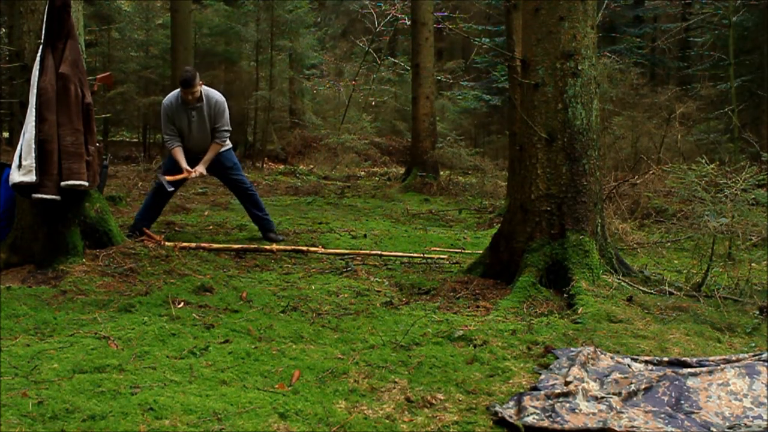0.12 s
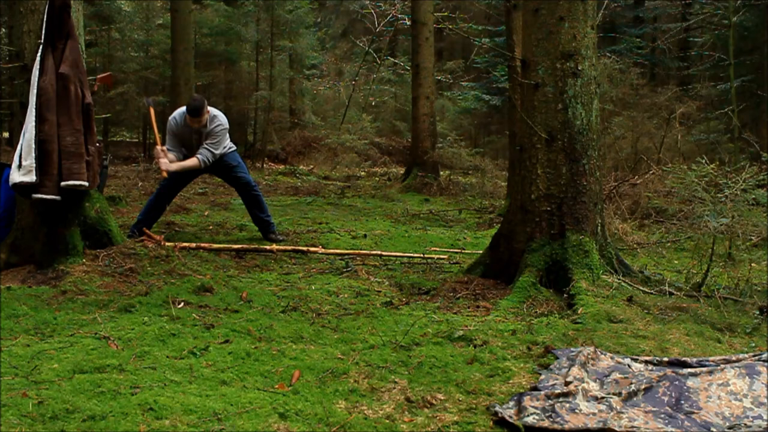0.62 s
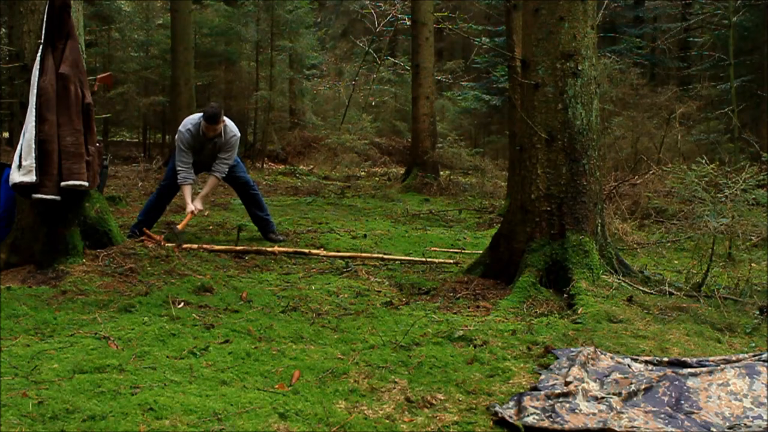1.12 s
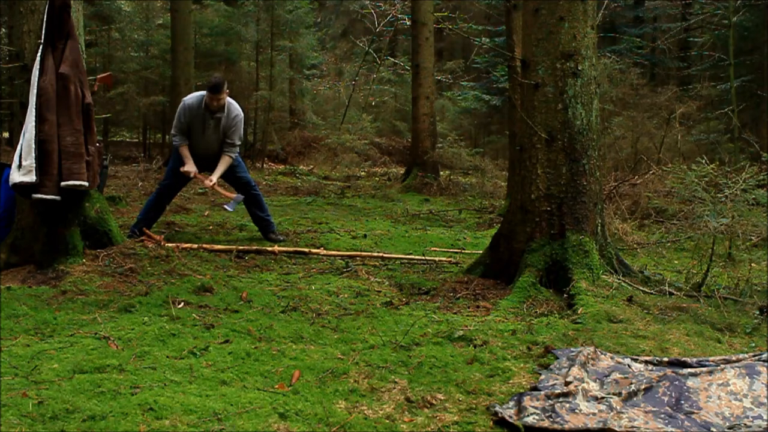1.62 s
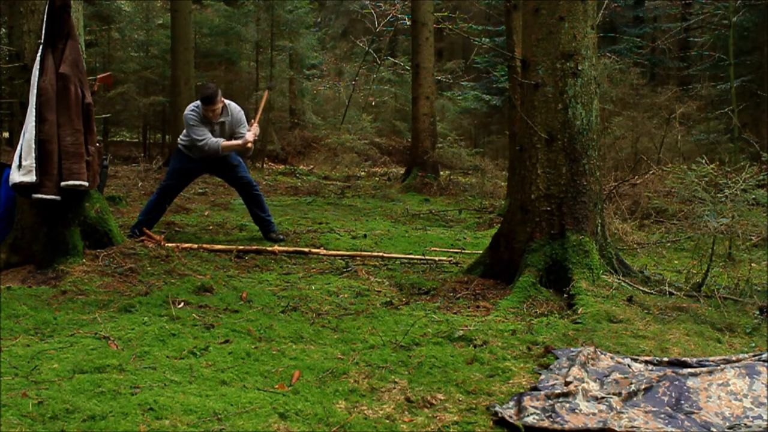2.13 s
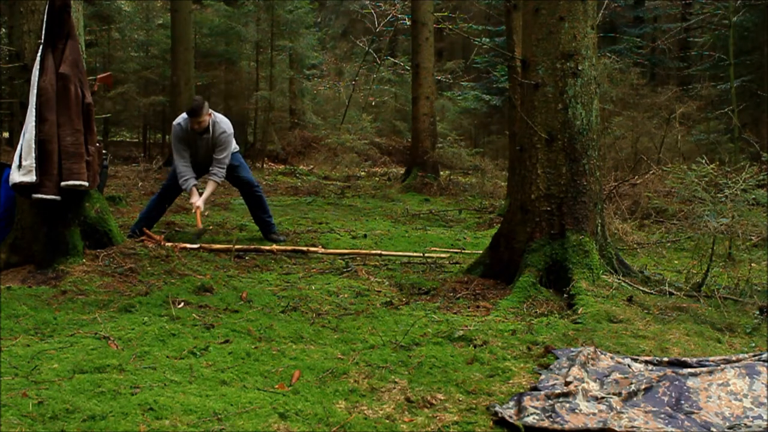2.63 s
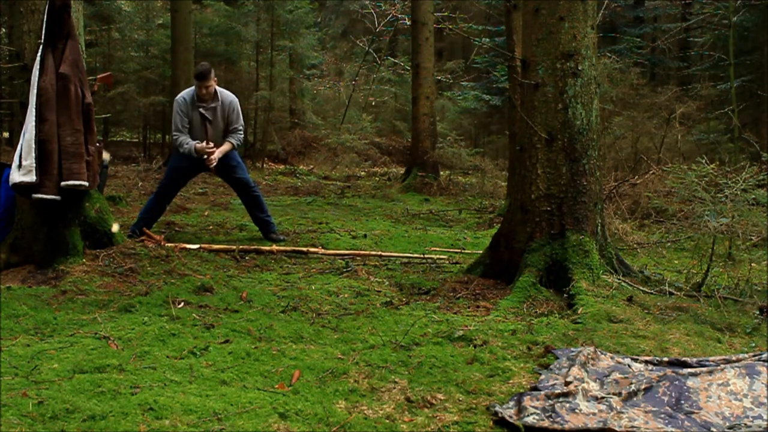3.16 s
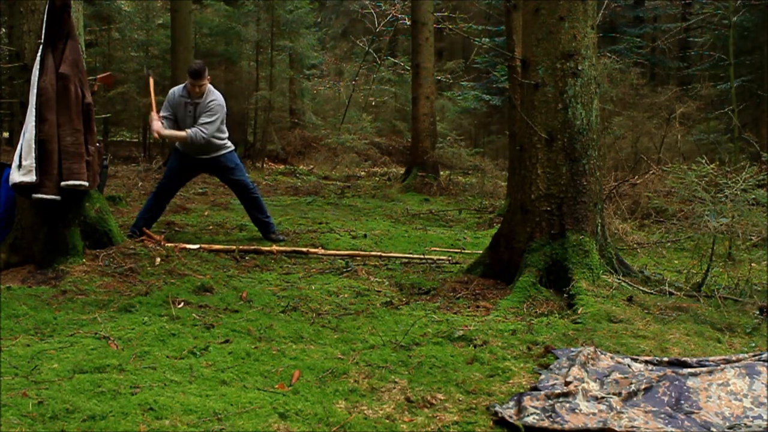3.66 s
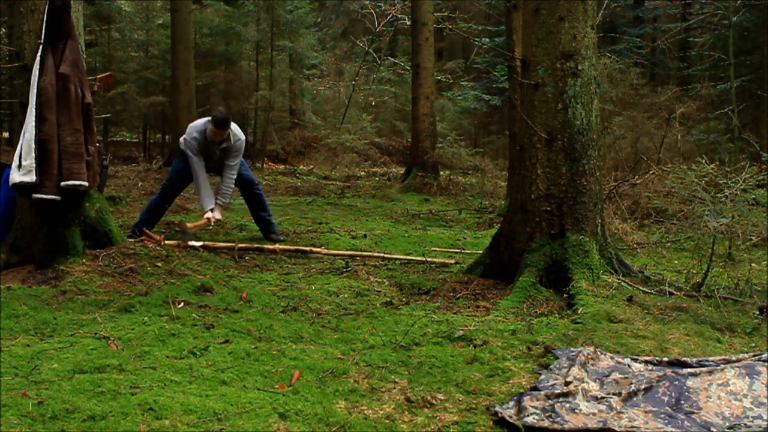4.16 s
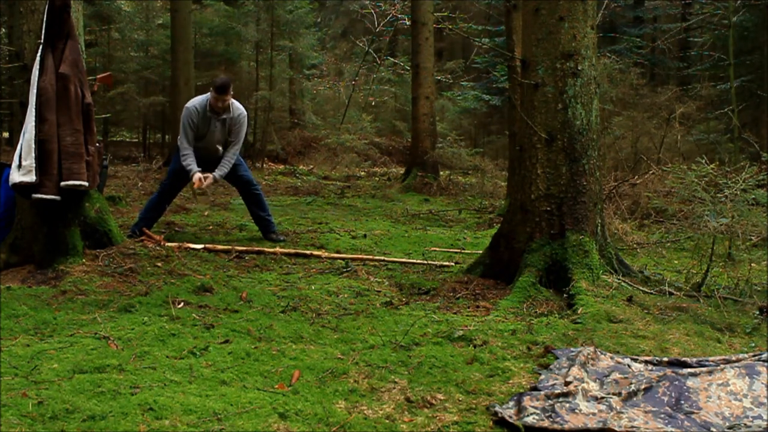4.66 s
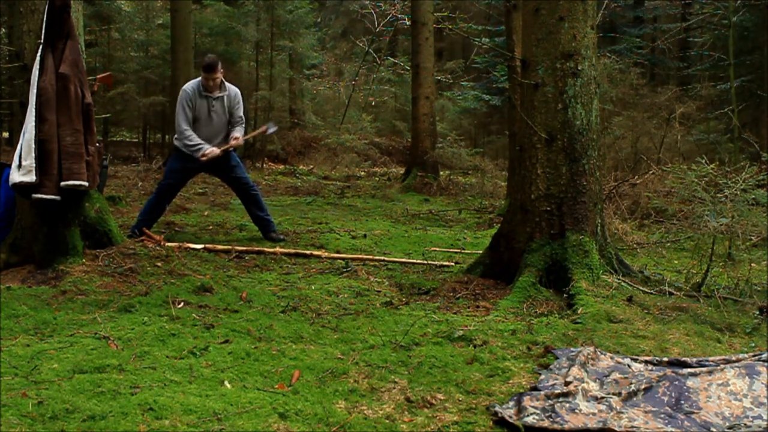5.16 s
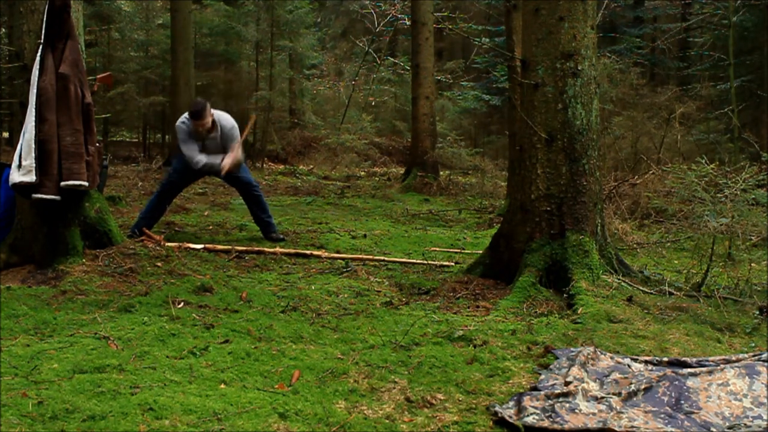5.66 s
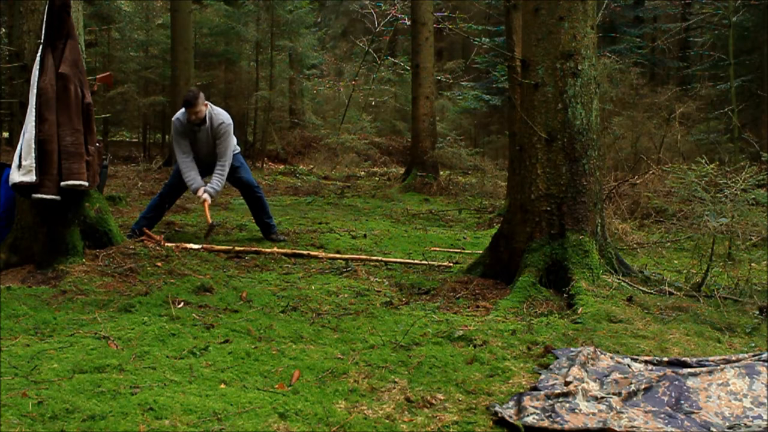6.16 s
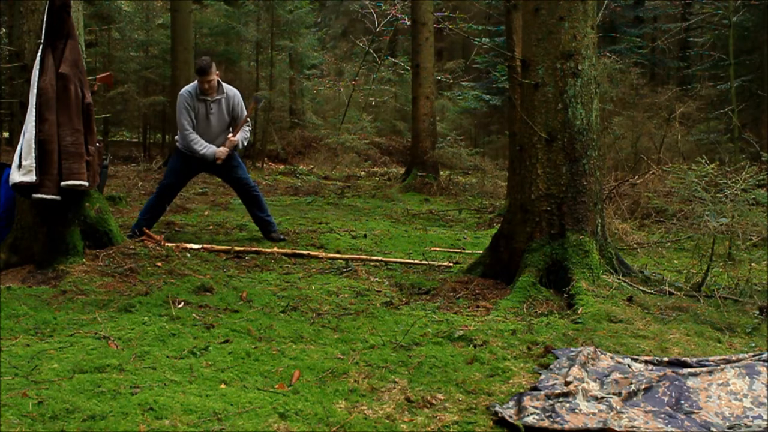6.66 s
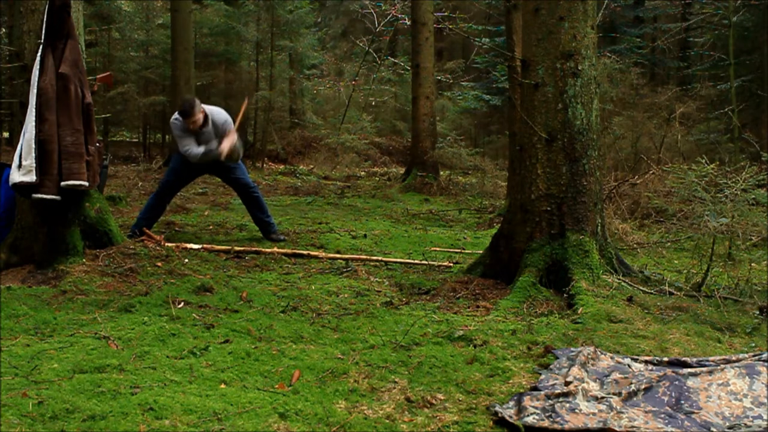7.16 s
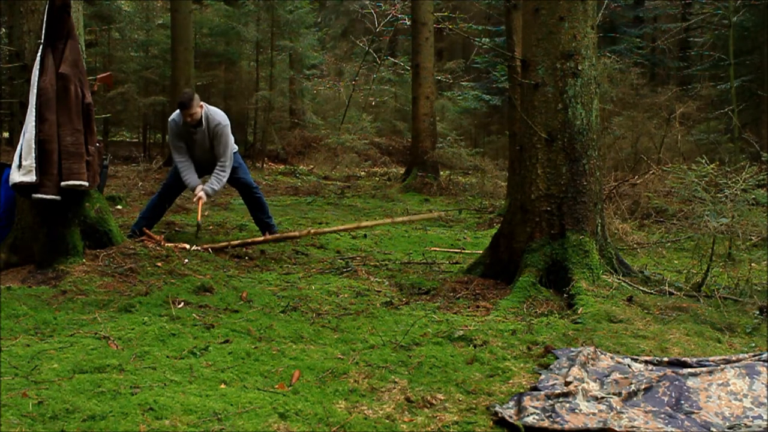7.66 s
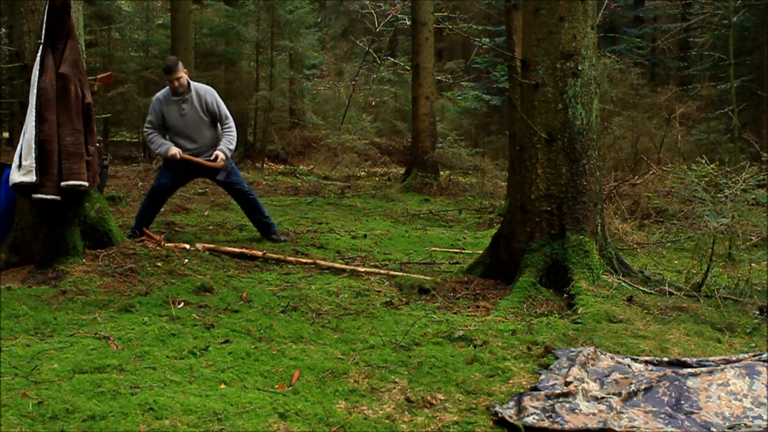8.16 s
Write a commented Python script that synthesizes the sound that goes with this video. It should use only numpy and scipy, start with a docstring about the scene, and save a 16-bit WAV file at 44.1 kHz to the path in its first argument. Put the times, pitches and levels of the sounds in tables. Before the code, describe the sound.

Spaced axe blows crack and knock on a light pole, echoing briefly off trees, while chips snap and a distant bird whistles.

```python
"""Chopping a pole in the forest

An axe chops a thin wooden pole lying on moss in a quiet conifer forest: noise and clicks drive its modes.
The pole rebounds, chips and twigs tick as short ringing snaps, and the trunks scatter the knocks back.
A far bird whistles long fluttering notes; a hand rubs along the handle as band-passed grit.
The microphone feeds only the right input and overloads on the blows; the left holds hiss and crosstalk."""
import sys
import numpy as np
from scipy import signal
from scipy.fft import rfft, irfft
from scipy.io import wavfile

SR = 44100
rng = np.random.default_rng(int(sys.argv[2]) if len(sys.argv) > 2 else 0)


def master(y):
    """Save y as 16-bit WAV."""
    cut = np.clip(np.atleast_2d(y).T, -1, 1)
    pcm = np.round(cut * 32767)  # scale
    wavfile.write(sys.argv[1], SR, pcm.astype(np.int16))


def voltage_ratio(level):
    """Linear amplitude factor for a level in decibels (scalar or array-like)."""
    return 10 ** (np.asarray(level, float) / 20)


N = 366030  # length in samples

# Source levels are relative, ahead of the layer balance and the input gain.
# forest hush, colour: f/Hz, level per Hz/dB
AIR_COLOUR = [(15, -38.5), (25, -1), (64, 1), (120, -2.5), (149, -11), (277, -6), (451, -4.5), (560, -3.5),
              (887, -2), (1940, -18.5), (2760, -14.5), (4030, -18), (5000, -17.5), (14800, -23.5),
              (16000, -21.5)]
# left input hiss, colour: f/Hz, level per Hz/dB
HISS_COLOUR = [(30, -9), (90, -4), (250, -6), (700, -1), (1050, 2), (1400, -3.5), (2100, -7.5),
               (2900, -2.5), (4100, -7), (5300, -6.5), (8000, -9), (16000, -10)]
# likeness of the left hiss to the right hush: f/Hz, correlation (0 to 1)
LIKENESS = [(30, 0.22), (200, 0.087), (700, 0.2), (1100, 0.7), (2000, 0.16), (3000, 0.62), (5300, 0.4),
            (9000, 0.24), (16000, .05)]
AIR_DB, HISS_DB = -68.5, -68  # rms

# hand sliding along the handle: middle t/s, rms level at the middle/dB
SLIDES = [(0.069, -66), (1.97, -71.5), (3.36, -76), (3.74, -73.5), (7.147, -74)]
SLIDE_HALF_S = 0.071  # from the middle to 1/e of the level

# axe blows: t/s, wood ring level/dB, ground thud level/dB, fibre crack level/dB, shaking t60/s
BLOWS = [(0.8928, -16.5, -34.5, -18, 0.058), (2.4603, -13.5, -65, -15.5, 0.075),
         (4.204, -12, -34.5, -12, 0.088), (5.8695, -14.5, -28.5, -14, 0.061),
         (7.4095, -11.5, -28, -9, 0.059)]
BLOW_HZ, BLOW_OCTAVES_PER_DB = 800, 0.41  # best-struck pitch at the mean crack level; sharper strikes higher
# further contacts after each blow: within some 40 ms the edge bites on into the fibres, later the pole jumps
# and knocks again: t/s, wood ring level/dB, fibre crack level/dB, best-struck f/Hz
FOLLOW_UPS = [(.919, -26, -39, 616), (.97, -44.5, -60, 341), (1.057, -39.5, -53, 576), (1.172, -56, -79, 800),
              (2.486, -21.5, -45, 810), (2.609, -35.5, -69, 850), (4.221, -23, -30.5, 700),
              (4.2395, -34.5, -31, 984), (4.393, -39.5, -55, 990), (5.913, -31, -66, 800),
              (5.961, -26, -50, 933), (6.032, -39.5, -59, 561), (7.430, -33.5, -68.5, 330),
              (7.469, -49, -61, 950), (7.917, -44, -47, 1190), (7.932, -46, -42.5, 1200),
              (7.993, -53.5, -86, 440)]
SHAKE_CYCLES = 70.4  # t60 of a follow-up contact's shaking, in cycles of its best-struck pitch
# a flat, low landing thuds most (drive in dB re the ring's drive); higher knocks thud less
FLAT_HZ, FLAT_THUD_DB, THUD_DB_PER_OCTAVE = 330, -10, -10
# modes of the pole: f/Hz, level/dB, t60/s
POLE_MODES = [(224.4, -6.5, 0.115), (318.6, -6.5, 0.17), (356, -6, 0.11), (420.7, -9, 0.1),
              (501.8, -1.5, 0.11), (590, -1, 0.084), (678, -1.5, 0.095), (746, -1.5, 0.052),
              (795.7, -1, 0.072), (850, 2.5, 0.0412), (938, 2, 0.064), (1045, 1, 0.024),
              (1161.5, -3.5, .06), (1250, -7, 0.046), (1730.5, -11, 0.03), (2103, -11, 0.046)]
OFF_PITCH_DB = 1.5  # loss of a mode one octave off the best-struck pitch; grows with the octaves squared
# modes of the soft ground: f/Hz, level/dB, t60/s
GROUND_MODES = [(93.5, -8.5, 0.13), (183, 3, 0.023), (290, -0.5, 0.064)]
# tearing fibres, colour: f/Hz, level per Hz/dB
CRACK_COLOUR = [(710, -33), (1200, 1), (1980, -8), (2890, -3.5), (3590, -4.5), (4130, -12), (7170, -22),
                (7820, -22), (10100, -24), (14400, -23.5), (16000, -42)]
CRACK_SHARE = 0.44  # the tearing dies in this share of the shaking time

# the trunks' scatter, colour: f/Hz, level per Hz/dB
SCATTER_COLOUR = [(40, -10), (70, -1.5), (250, 9.5), (450, -2), (950, -5.5), (1400, -1.5), (2000, -13),
                  (3100, -8.5), (4000, -16.5), (5200, -18.5), (8000, -30), (16000, -43.5)]
# dying away among the near trunks: f/Hz, t60/s
FOREST_T60 = [(80, 0.48), (250, 0.24), (900, 0.77), (2000, 0.64), (4000, 0.59), (7000, 0.42), (14000, 0.63)]
FAR_DB = -16.5  # echo of the far trunks re the near ones
SPLIT_HZ = 1400  # bands starting above this echo the cracks, the others echo the knocks
SCATTER_DB, LOW_SCATTER_DB = 12, -29.5  # high and low echo
LONG_SHAKE_DB = 15.5  # gained per decade of shaking time: longer contact sends more energy into the trees

# bird notes: start t/s, f/Hz, level/dB
WHISTLES = [(.94, 4220, -70.5), (1.165, 4040, -71), (3.827, 4380, -72), (4.061, 4130, -71.5),
            (4.37, 4340, -71.5), (6.899, 4170, -70.5), (7.118, 4190, -68)]
NOTE_S = 0.22  # a note is held this long before it fades
FLUTTER = 0.93  # depth of a note's flutter re the steady tone
# blurred band under each note's start: how far below, level re the note, t60
SKIRT_HZ, SKIRT_DB, SKIRT_T60_S = 100, 0, 0.68

# chips and twigs: t/s, peak level/dB, f/Hz, ring t60/cycles
TICKS = [(1.373, -59, 2270, 25), (1.455, -50, 1000, 22), (2.4277, -54, 2720, 25), (2.5669, -43, 2870, 19),
         (2.6965, -43.5, 1260, 44), (2.819, -46.5, 1210, 28), (3.5896, -52, 3296, 40),
         (4.6591, -44, 1164, 29), (5.964, -33.5, 3100, 40), (6.2226, -37.5, 1200, 14),
         (6.2833, -54.5, 1738, 25), (7.4484, -59, 2920, 30), (7.457, -23.5, 3123, 26),
         (7.753, -39.5, 1695, 67), (7.9236, -36.5, 1710, 39), (7.939, -46.5, 1250, 16),
         (7.9652, -52, 2360, 49), (8.089, -37, 1250, 77)]
# overtones of a chip: multiple of its pitch, level/dB
CHIP_OVERTONES = [(1, 6.5), (1.4, -4.5), (1.8, -3.5), (2.4, -11)]
CHIP_TOP_HZ = 3500  # overtones above this are damped by the moss
SNAP_CYCLES, SNAP_DB, SNAP_FRONT_DB = 17.5, 10, 3.5  # snap t60 in cycles; broad snap re the ring; first click

MIC_GAIN_DB, CROSSTALK_DB, OVERLOAD = 4, -50, 0.2  # OVERLOAD: amplitude ceiling of the overload stage


def rms_one(x):
    """Scale to rms 1."""
    return x / np.sqrt(np.mean(x ** 2) + 1e-20)


def at_hz(points, hz):
    """Read a table on a log-frequency axis."""
    table_hz, values = np.array(points).T
    return np.interp(np.log(np.maximum(hz, 1)), np.log(table_hz), values)


def coloured(x, spectrum):
    """Give white noise a spectrum."""
    size = x.shape[-1]
    gain = voltage_ratio(at_hz(spectrum, np.fft.rfftfreq(size, 1 / SR)))
    return irfft(rfft(x) * gain, size)


def band(x, low_hz, high_hz):
    """Band-pass."""
    return signal.sosfilt(signal.butter(2, [low_hz, high_hz], "band", fs=SR, output="sos"), x)


def low_pass(x, hz):
    """Keep only the slow wander of a noise."""
    return signal.sosfilt(signal.butter(2, hz, fs=SR, output="sos"), x)


def high_pass(x, order, hz):
    """Cut the bass."""
    return signal.sosfilt(signal.butter(order, hz, "high", fs=SR, output="sos"), x)


def ring(force, hz, t60):
    """A mode driven by a force; unit noise rings it at about unit height."""
    r, w = voltage_ratio(-60 / (t60 * SR)), 2 * np.pi * hz / SR
    drive = np.sin(w) * np.sqrt(1 - r * r)
    return signal.lfilter([0, drive], [1, -2 * r * np.cos(w), r * r], force + 1e-18)


def bursts(starts, levels_db, t60s, rise_s):
    """Envelope of bursts that rise fast and die away."""
    out = np.zeros(N)
    for s, db, t60, rise in zip(starts, levels_db, t60s, np.broadcast_to(rise_s, len(starts))):
        i = int(s * SR)
        t = np.arange(min(N - i, SR // 2)) / SR
        decay = voltage_ratio(db - 60 * t / max(t60, .003))
        out[i:i + len(t)] += decay * (1 - np.exp(-t / rise))
    return out


def fronts(starts, levels_db):
    """The first shock of each contact as one click."""
    out = np.zeros(N)
    out[(np.asarray(starts) * SR).astype(int)] = voltage_ratio(levels_db)
    return out


def grit(spread_db):
    """Uneven random clicks: fibres giving way."""
    unevenness = np.minimum(rng.exponential(1, N), 5)
    return rms_one(rng.standard_normal(N) * voltage_ratio(spread_db * unevenness))


def hush():
    """Far wind in the crowns on the right, input hiss on the left: coloured noises, partly alike."""
    right, own = rfft(rng.standard_normal((2, N)))
    alike = np.clip(at_hz(LIKENESS, np.fft.rfftfreq(N, 1 / SR)), 0, 1)
    left = irfft(alike * right + np.sqrt(1 - alike ** 2) * own, N)
    hiss = voltage_ratio(HISS_DB) * rms_one(coloured(left, HISS_COLOUR))
    air = voltage_ratio(AIR_DB) * rms_one(coloured(irfft(right, N), AIR_COLOUR))
    return hiss, air


def hand():
    """Soft rubbing noise, strongest near 3 and 5 kHz, swelling and sinking with each slide."""
    t, noise = np.arange(N) / SR, grit(2.1)
    rub = rms_one(band(noise, 2595, 3650) + 0.6 * band(noise, 4800, 5000))
    return rub * sum(voltage_ratio(db) * np.exp(-((t - s) / SLIDE_HALF_S) ** 2) for s, db in SLIDES)


def contacts():
    """Blows and their follow-up contacts in one list: t/s, wood, thud and crack level/dB, shaking t60/s, best-
    struck f/Hz."""
    s, wood_db, thud_db, crack_db, shake_s = np.transpose(BLOWS)
    best_hz = BLOW_HZ * 2 ** (BLOW_OCTAVES_PER_DB * (crack_db - crack_db.mean()))
    blows = [s, wood_db, thud_db, crack_db, shake_s, best_hz]
    s, wood_db, crack_db, hz = np.transpose(FOLLOW_UPS)
    thud_db = wood_db + FLAT_THUD_DB + THUD_DB_PER_OCTAVE * np.log2(hz / FLAT_HZ)
    return np.hstack([blows, [s, wood_db, thud_db, crack_db, SHAKE_CYCLES / hz, hz]])


def pole_ring(s, wood_db, shake_s, best_hz):
    """Each contact shocks and shakes the pole's modes, most of all those near its best-struck pitch."""
    softness_db = wood_db.max() - wood_db
    # weak contacts are softer: slower to build, less of a first shock
    rise_s = 0.00024 * voltage_ratio(1.04 * softness_db)
    shock_db = 23.5 - 0.44 * softness_db
    jolts = grit(2.3)
    wood = 0
    for k, (hz, db, t60) in enumerate(POLE_MODES):
        struck_db = wood_db + db - OFF_PITCH_DB * np.log2(hz / best_hz) ** 2
        shaking = bursts(s, struck_db, shake_s, rise_s) * jolts + fronts(s, struck_db + shock_db)
        wood = wood + (-1) ** k * ring(shaking, hz, t60)
    return wood


def ground_thud(s, thud_db, shake_s):
    """The pole is driven into the moss: bursts of noise push a few short, low modes."""
    push = bursts(s, thud_db, shake_s, rise_s=0.0016) * rng.standard_normal(N)
    return sum(voltage_ratio(db) * ring(push, hz, t60) for hz, db, t60 in GROUND_MODES)


def fibre_crack(s, crack_db, shake_s):
    """Tearing fibres: a click, a short burst of grit and slower single splinters, through one colour."""
    grid = np.linspace(0, 1, 256)
    # level doubled because the minimum-phase version takes the square root of the response
    response = voltage_ratio(2 * at_hz(CRACK_COLOUR, grid * SR / 2))
    colour = signal.minimum_phase(signal.firwin2(511, grid, response))
    tearing = bursts(s, crack_db, CRACK_SHARE * shake_s, rise_s=0.0012) * grit(3.9)
    tearing += fronts(s, crack_db - 20.0)
    # splinters at 130 a second on average, about a millisecond each
    splits = (rng.random(N) < 130 / SR) * rng.exponential(1, N)
    parting = signal.lfilter([1], [1, -.97], splits)
    splintering = bursts(s, crack_db - 11, 0.99 * shake_s, rise_s=0.0085)
    tearing += splintering * (0.64 + 0.97 * parting) * rng.standard_normal(N)
    return signal.lfilter(colour / np.linalg.norm(colour), [1], tearing)


def chops():
    """The edge tears fibres (crack), shakes the pole (modes) and drives it into the moss (thud)."""
    s, wood_db, thud_db, crack_db, shake_s, best_hz = contacts()
    wood = pole_ring(s, wood_db, shake_s, best_hz)
    thud = ground_thud(s, thud_db, shake_s)
    crack = fibre_crack(s, crack_db, shake_s)
    return voltage_ratio(-3.0) * wood + voltage_ratio(8.5) * thud + voltage_ratio(4.5) * crack


def scatter_tails():
    """Lumpy low and high tails of noise in third-octave bands, each band dying at its own pace."""
    t = np.arange(2 * SR) / SR
    edges = 50 * 2 ** np.arange(0, 8.4, 1 / 3)
    tails = np.zeros((2, 2 * SR))
    trunks = rms_one(low_pass(rng.standard_normal(len(t)), 60))
    # some trunks stand out a little
    noise = coloured(rng.standard_normal(tails.shape) * voltage_ratio(2.2 * trunks), SCATTER_COLOUR)
    for k, (a, b) in enumerate(zip(edges, edges[1:])):
        fall_db = -60 * t / at_hz(FOREST_T60, np.sqrt(a * b))
        near_and_far = voltage_ratio(fall_db) + voltage_ratio(FAR_DB + 0.25 * fall_db)
        tails[int(a > SPLIT_HZ)] += band(noise[k % 2], a, b) * near_and_far
    # the nearest trunks are metres away, so the tail builds over some 20 ms
    return tails * (1 - np.exp(-(t / 0.02) ** 2)) / np.linalg.norm(tails)


def forest(knocks):
    """Trunks scatter each shock back: the lows echo the knocks themselves, the highs their cracks and snaps."""
    s, _, _, crack_db, shake_s, _ = contacts()
    sent_db = SCATTER_DB + LONG_SHAKE_DB * np.log10(10 * shake_s)
    low_tail, high_tail = scatter_tails()
    tick_s, tick_db, *_ = np.transpose(TICKS)
    snaps = fronts(tick_s, tick_db + SCATTER_DB - 9.0)
    cracks = fronts(s, crack_db + sent_db + 1.5)
    low = signal.fftconvolve(voltage_ratio(LOW_SCATTER_DB) * knocks, low_tail)
    high = signal.fftconvolve(cracks + snaps, high_tail)
    return (low + high)[:N]


def bird():
    """Steady whistles, smeared by many paths through the trees into narrow fluttering bands."""
    out, t = np.zeros(N), np.arange(N) / SR
    flutter_a, flutter_b = [rms_one(low_pass(v, 35.0)) for v in rng.standard_normal((2, N))]
    for s, hz, db in WHISTLES:
        since = t - s
        held = np.clip(since / 0.0082, 0, 1) * voltage_ratio(-18 * np.clip(since, 0, 1))
        # after the hold: a quick small drop, then a long fade
        after = since - NOTE_S
        fade = voltage_ratio(-60 * np.clip(after, 0, 1) / 1.0 - 3.7 * np.clip(after / 0.027, 0, 1))
        w, under = 2 * np.pi * hz * t, 2 * np.pi * (hz - SKIRT_HZ) * t
        skirt = flutter_b * np.cos(under) + flutter_a * np.sin(under)
        note = (1 + FLUTTER * flutter_a) * np.cos(w) + FLUTTER * flutter_b * np.sin(w)
        out += voltage_ratio(db + SKIRT_DB - 60 * np.clip(since, 0, 2) / SKIRT_T60_S) * held * skirt
        out += voltage_ratio(db) * held * fade * note
    return out


def ticks():
    """A sharp snap of a few milliseconds, part broad, part ringing at the chip's own pitch and overtones."""
    out, noise, size = np.zeros(N), rng.standard_normal(N), SR // 8
    for s, db, hz, cycles in TICKS:
        i = int(s * SR)
        snap = bursts([0], [0], [SNAP_CYCLES / hz], rise_s=.0001)[:size] * noise[i:i + size]
        snap += fronts([0], SNAP_FRONT_DB)[:size]
        rings = 0
        for k, overtone_db in CHIP_OVERTONES:
            damping = 1 + (k * hz / CHIP_TOP_HZ) ** 6
            rings = rings + voltage_ratio(overtone_db) * ring(snap, k * hz, cycles / (k * hz)) / damping
        broad = band(band(snap, 0.91 * hz, 3000), 530, 2800)
        tick = band(rings, 0.75 * hz, 5200) + voltage_ratio(SNAP_DB) * broad
        out[i:i + size] += voltage_ratio(db) * tick / np.abs(tick).max()
    return out


def scene():
    """Left holds only its hiss, right the whole forest."""
    left, air = hush()
    knocks = chops() + ticks()
    return np.array([left, knocks + forest(knocks) + bird() + hand() + air])


def top_cut(x):
    """Nothing passes above the cut-off."""
    return signal.sosfilt(signal.butter(12, 16530, fs=SR, output="sos"), x)


def record(dry):
    """The right input cuts deep bass, overloads with a firm knee, then trims bass and lifts treble; some leaks left."""
    loud = voltage_ratio(MIC_GAIN_DB) * high_pass(dry[1], 1, 22) / OVERLOAD
    right = OVERLOAD * loud / (1 + np.abs(loud) ** 5.0) ** (1 / 5.0)
    right = high_pass(right, 2, 45)
    right = right + 0.18 * band(right, 8500, 16000)
    left = dry[0] + voltage_ratio(CROSSTALK_DB) * band(right, 400, 5000)
    return top_cut(np.array([left, right]))


dry = scene()
out = record(dry)
master(out)
```